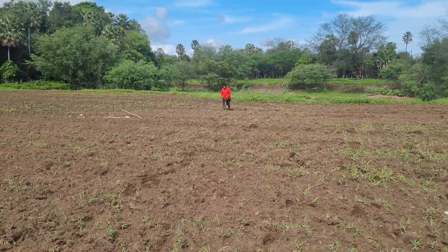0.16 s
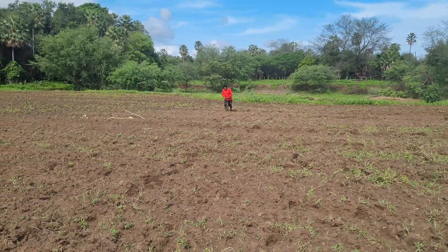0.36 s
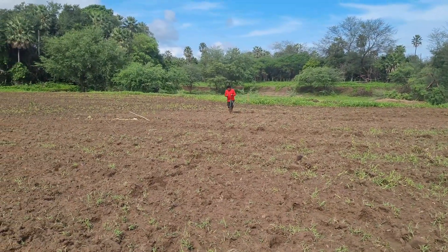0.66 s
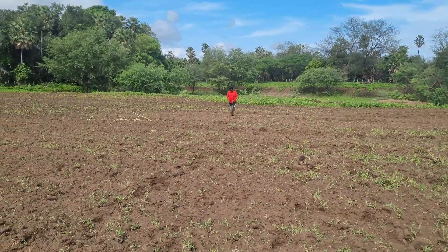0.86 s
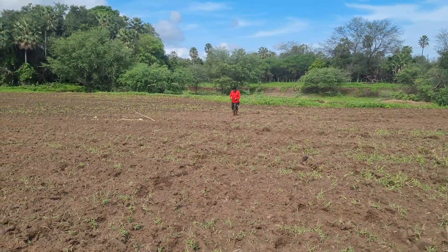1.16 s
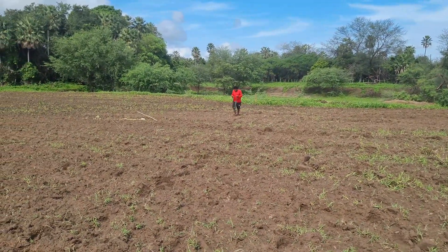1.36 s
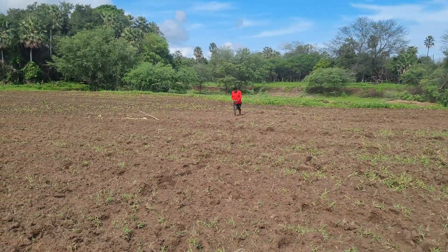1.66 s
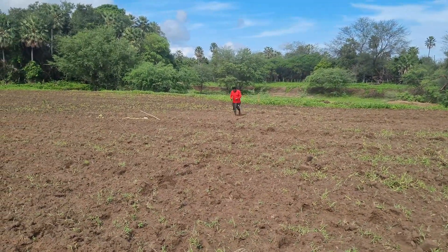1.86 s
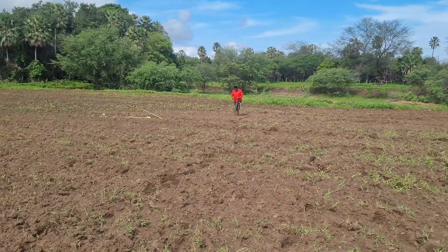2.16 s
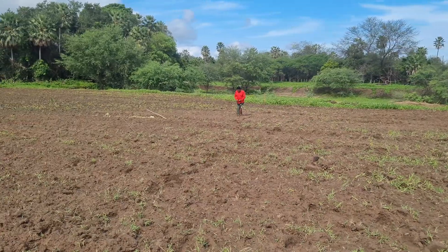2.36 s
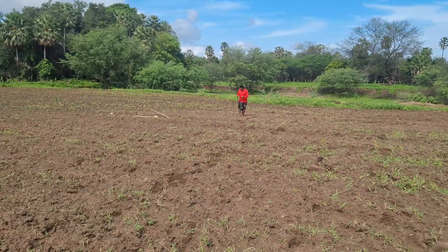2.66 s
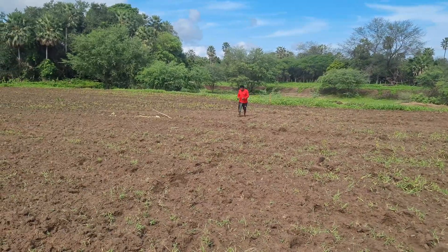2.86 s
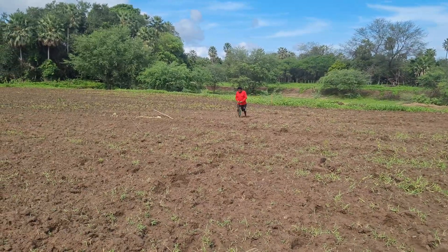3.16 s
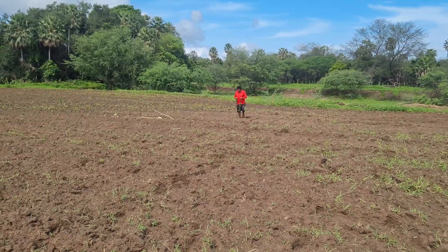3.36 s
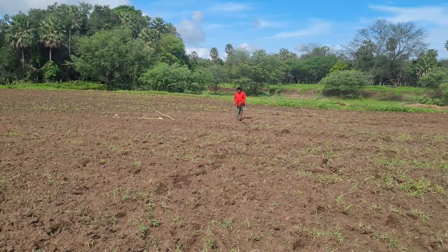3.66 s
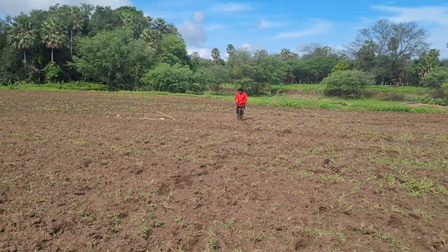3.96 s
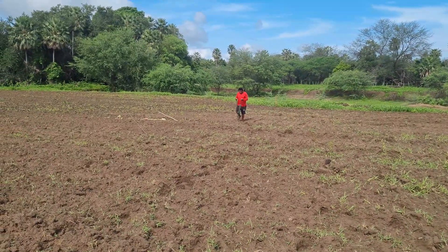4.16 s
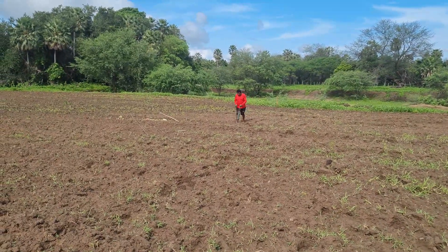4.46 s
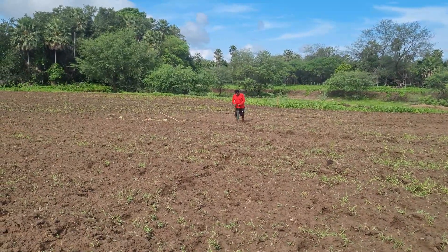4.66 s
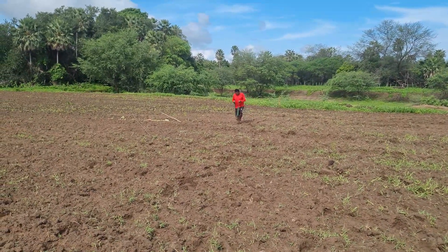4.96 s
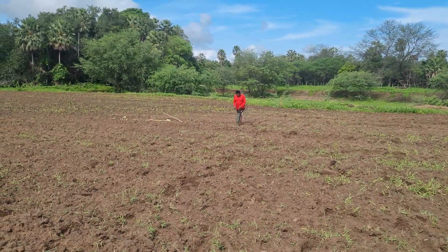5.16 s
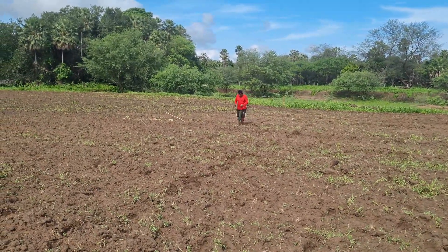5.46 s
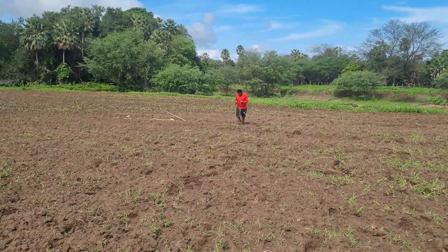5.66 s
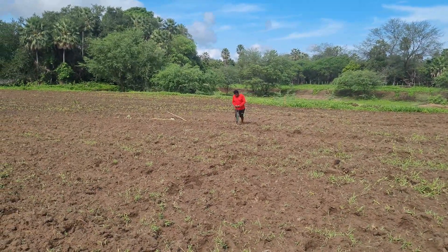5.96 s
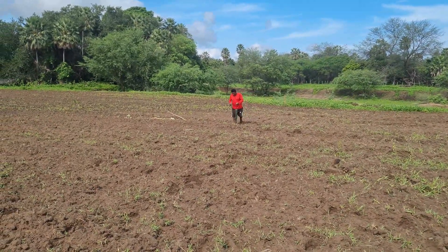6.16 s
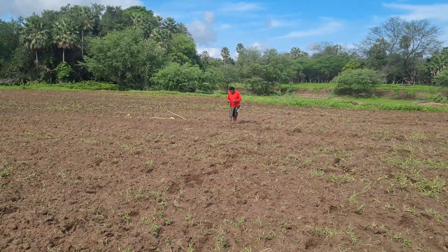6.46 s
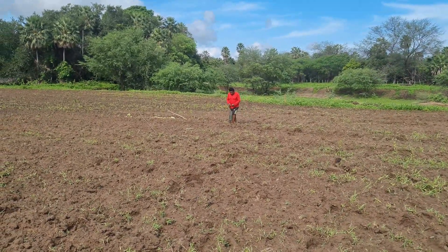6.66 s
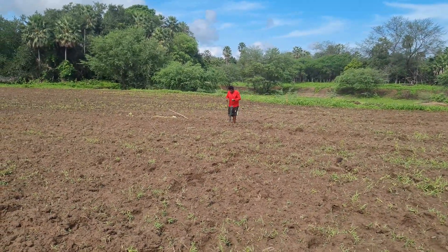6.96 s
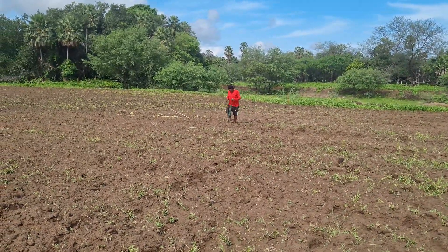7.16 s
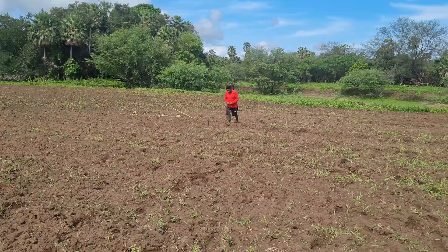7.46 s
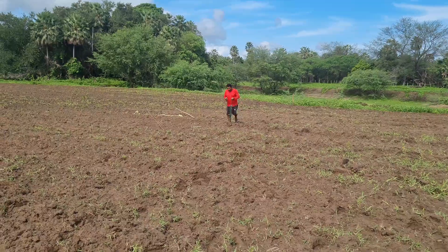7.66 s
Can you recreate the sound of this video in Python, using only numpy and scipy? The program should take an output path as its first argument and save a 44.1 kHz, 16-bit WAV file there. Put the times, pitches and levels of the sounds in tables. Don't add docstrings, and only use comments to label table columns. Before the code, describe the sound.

A close, dry, bright stereo sound of a hand-held seed planter in an open field, as picked up by a phone. At about 0.1 seconds seeds rush down the hollow metal tube, the thin jaw crunches into soil near 0.25, and the latch clacks sharply at 0.35. The cycle repeats about every 0.7 seconds, with clacks near 1.05, 1.75, 2.46, 3.18, 3.9, 4.6, 5.3, 6.05, 6.76 and 7.47. Most are followed about 0.2 seconds later by a lighter springing-open snap, though not around 0.55 or 6.25. Between them loose seeds tick and trickle, the hinge gives tiny squeaks and the spring rings very high. Quiet bird whistles and wobbling low trills are scattered throughout, with an arching cry at 0.3 to 0.75 and a higher whistle near 6.3. Soft air and a faint wavering engine drone continue until the end at about 7.8 seconds.

```python
import sys
import numpy as np
from scipy import signal
from scipy.fft import irfft
from scipy.io import wavfile
from scipy.ndimage import uniform_filter1d

SR = 44100
rng = np.random.default_rng(int(sys.argv[2]) if len(sys.argv) > 2 else 0)


def unload_wav(signal):
    wavfile.write(
        sys.argv[1],
        SR,
        np.round(np.clip(np.atleast_2d(signal).T, -1, 1) * 32767).astype(np.int16),
    )


def magnitude_from_level(level_db):
    exponent = np.asarray(level_db, float) / 20
    return 10 ** exponent


N = 344862

PLACES = 5
TOP_S = 0.1
CONTACT_MS, LATCH_FALL_MS = 0.4, 3.2

# (frequency [Hz], width [Hz], level [dB])
TUBE_MODES = [(277, 230, -11.5), (562.5, 83, -4.5), (729, 111, 0), (1100, 115, 4), (1610, 33, 10)]
# (frequency [Hz], gain [dB])
RIGHT_PORT = [(300, 3), (1000, 7), (1900, -7), (2700, 3), (4200, -2), (5500, 2), (7300, -7.5),
              (9300, -21.5), (10200, -8), (11000, 3.5), (11800, 5.5), (13000, 1), (15600, -12.5),
              (16300, -61)]
# (time [s], level [dB], ring [Hz], treble [dB], tube level [dB])
LATCH_CLACKS = [(0.3505, -13.5, 6340, 0.5, -47), (1.0527, -16.5, 4150, -2.5, -47),
                (1.7537, -14, 4300, 3, -38), (2.4638, -16, 6900, 7, -40.5), (3.176, -13.5, 2300, 4.5, -37),
                (3.8973, -15, 7000, 2, -36), (4.615, -15, 5060, 1, -35.5), (5.326, -11.5, 6800, 2, -39.5),
                (6.0455, -14, 7030, 1, -39.5), (6.7622, -13.5, 5600, 0.5, -38),
                (7.4672, -15.5, 7060, -.6, -46.5)]
# (time [s], level [dB], ring [Hz], treble [dB], tube level [dB])
LATCH_RELEASES = [(1.256, -17, 4930, 0.5, -43), (1.958, -18.5, 6600, 2, -51), (2.6681, -21, 5080, 2, -58),
                  (3.369, -15.5, 5040, 0.5, -51), (4.0976, -15.5, 5090, -2, -45),
                  (4.814, -17, 2690, -0.5, -43.5), (5.5363, -21.5, 2870, 0.5, -52),
                  (6.958, -21, 2960, 5.5, -48.5), (7.6409, -16, 5140, 3.5, -42)]


def evened(x):
    return x / np.sqrt(np.mean(x ** 2) + 1e-20)


def read(points, hz):
    f, value = np.transpose(points)
    return np.interp(np.log(hz + 1), np.log(f + 1), value)


def add(mix, s, sound):
    part = mix[round(s * SR):][:len(sound)]
    part += sound[:len(part)]


def from_tops(x):
    return x[..., round(TOP_S * SR):][..., :N]


def phase(hz):
    return 2 * np.pi * np.cumsum(hz) / SR


def resonate(x, hz, width):
    r = np.exp(-np.pi * width / SR)
    if np.ndim(hz) == 0:
        return 2 * signal.lfilter([1 - r], [1, -r * np.exp(2j * np.pi * hz / SR)], x + 1e-18).real
    turn = np.exp(1j * phase(hz))
    return 2 * (turn * signal.lfilter([1 - r], [1, -r], x * turn.conj() + 1e-18)).real


def body(x, modes):
    return sum((-1) ** k * magnitude_from_level(db) * resonate(x, hz, width) for k, (hz, width, db) in enumerate(modes))


def high_pass(x, order, hz):
    return signal.sosfilt(signal.butter(order, hz, "high", fs=SR, output="sos"), x)


def seeds(shape, share, spread_db):
    size = magnitude_from_level(spread_db * np.minimum(rng.exponential(1, shape), 4)) * rng.choice([-1., 1.], shape)
    return evened(size * (rng.random(shape) < share))


def swell(db, rise_ms, fall_ms):
    ms = np.arange(round(.25 * SR)) / SR * 1000 - 1000 * TOP_S
    rise, fall = np.clip([rise_ms, fall_ms], .3, 40)
    hard = rise < 3
    if hard:
        rise = .4
    fade = np.where(ms < 0, (abs(ms) / rise) ** 1.4, (abs(ms) / fall) ** .85)
    tail = magnitude_from_level(-16.5 - 9 * ms / 22) * (ms > 0)
    crack = magnitude_from_level(-2.5 - 9 * abs(ms) / 0.28) * (ms > 0) * hard
    return magnitude_from_level(db) * (magnitude_from_level(-9 * fade) + tail + crack) * signal.windows.tukey(len(ms), .1)


def air():
    # (frequency [Hz], level [dB per Hz])
    air_colour = [(30, -3), (44, 6), (59, -3), (180, -11.5), (1130, -13.5), (1370, -21.5), (2690, -5),
                  (8590, 0.5), (11900, 8), (16000, -28)]
    frames, hz = N // 256 + 5, np.fft.rfftfreq(1024, 1 / SR)
    a, b, c, d, patches = rng.standard_normal((frames, 513, 5)).T
    patches = evened(uniform_filter1d(uniform_filter1d(patches, 8, 0), 20, 1))
    patches = 2.8 * patches * (hz[:, None] > 150)
    shared, left = .35, a + 1j * b
    z = np.array([left, shared * left + np.sqrt(1 - shared ** 2) * (c + 1j * d)])
    z *= magnitude_from_level(read(air_colour, hz)[:, None] + patches) / (1 + (hz[:, None] / 2500) ** 2)
    wash = magnitude_from_level(-54.5) * evened(signal.istft(z, nperseg=1024, noverlap=768)[1][:, :N])
    return high_pass(wash, 4, 36) * magnitude_from_level(np.array([[-1.5], [1.5]]))


def far_engine():
    # (time [s], pitch [Hz], level [dB])
    drone_course = [(0, 55.3, -64), (1.6, 60.8, -62), (2.6, 72.6, -67.5), (4, 50.9, -69), (7.82, 47.6, -65)]
    s, hz, db = np.transpose(drone_course)
    t = np.arange(N) / SR
    hz = np.interp(t, s, hz)
    drone = evened(resonate(resonate(rng.standard_normal(N), hz, 2.3), hz, 2.3))
    return magnitude_from_level(np.interp(t, s, db)) * drone * magnitude_from_level(np.array([[-3.], [3.]]))


def whistles():
    # (time [s], length [s], first pitch [Hz], last pitch [Hz], level at the right port [dB])
    whistle_calls = [(0, 0.13, 988, 780, -49.5), (0.1, 0.12, 2840, 2750, -38),
                     (0.326, 0.07, 2590, 3060, -43), (0.618, 0.11, 3650, 3440, -45.5),
                     (0.703, 0.045, 3420, 2510, -43), (1.254, 0.18, 938, 725, -49),
                     (1.316, 0.13, 2140, 2270, -58), (1.4, 0.022, 3270, 3220, -46),
                     (1.785, .17, 1045, 877, -46.5), (2.012, 0.086, 1030, 915, -59),
                     (2.1, 0.021, 3150, 3260, -43), (2.14, .06, 5570, 5550, -46),
                     (2.755, 0.045, 3570, 3080, -66), (2.835, .015, 4500, 4460, -44.5),
                     (3.285, 0.16, 933, 762, -50.5), (3.47, 0.047, 4030, 3240, -52),
                     (3.568, 0.015, 3490, 3330, -41), (3.817, 0.21, 1010, 854, -49.5),
                     (3.981, 0.049, 865, 720, -49.5), (4.27, 0.075, 3200, 3190, -54.5),
                     (4.842, 0.059, 3100, 3170, -51), (4.98, 0.055, 3250, 2820, -56),
                     (5.342, 0.13, 960, 766, -48), (5.641, 0.075, 3720, 3550, -40.5),
                     (5.745, 0.023, 3530, 3580, -40), (5.934, 0.11, 1040, 850, -48),
                     (6.142, 0.058, 708, 760, -55), (6.267, 0.2, 5450, 5220, -35),
                     (7.043, 0.042, 2570, 2160, -35), (7.046, 0.087, 1610, 1635, -47.5),
                     (7.06, 0.019, 4450, 4480, -35), (7.109, 0.03, 3260, 3180, -37),
                     (7.122, 0.017, 4430, 4600, -46), (7.155, .17, 939, 750, -47.5),
                     (7.169, 0.253, 2060, 1990, -51.5), (7.523, 0.093, 1920, 1830, -45.5),
                     (7.663, 0.17, 1027, 901, -45)]
    out = np.zeros(N)
    for s, length, hz0, hz2, db in whistle_calls:
        hz1 = hz0 + 0.337 * (hz2 - hz0)
        u = np.linspace(0, 2, round(length * SR))
        hz = np.polyval(np.polyfit([0, 1, 2], [hz0, hz1, hz2], 2), u)
        shape = signal.windows.tukey(len(u), .25) * magnitude_from_level(-2.5 * u)
        add(out, s, magnitude_from_level(db - read(RIGHT_PORT, hz1)) * np.sin(phase(hz)) * shape)
    return out


def trills():
    # (time [s], length [s], pitch [Hz], wobble [turns/s], level at the right port [dB])
    trill_calls = [(1.147, 0.17, 838, 20.4, -51), (1.833, 0.19, 872, 31.6, -49),
                   (2.577, .15, 819, 23, -50.5), (3.31, 0.13, 819, 27, -48),
                   (3.647, 0.096, 950, 24.5, -51.5), (4.022, 0.12, 820, 19.7, -48.5),
                   (5.447, 0.11, 832, 23, -45), (5.724, 0.072, 974, 13, -55),
                   (6.197, 0.055, 808, 37, -47.5), (6.892, 0.11, 795, 18, -50),
                   (7.506, 0.084, 876, 18.4, -46)]
    out = np.zeros(N)
    for s, length, hz, turns, db in trill_calls:
        wobble = 2 * np.pi * turns * np.arange(round(length * SR)) / SR
        pitch = hz * (1 - 0.093 * np.cos(wobble))
        pulse = (1 - 0.6 * np.cos(wobble + 1.6)) * signal.windows.tukey(len(wobble), .3)
        add(out, s, magnitude_from_level(db - 2.5 - read(RIGHT_PORT, hz)) * pulse * np.sin(phase(pitch)))
    return out


def arching_cry():
    # (time [s], pitch [Hz], level [dB])
    cry_course = [(.3, 830, -68), (.37, 960, -60), (.46, 1090, -58), (.54, 1170, -58), (.61, 1230, -57),
                  (.7, 1150, -57), (.73, 1090, -61), (.76, 890, -66)]
    cry_harmonics = [-14, 8.5, -3]
    s, hz, db = np.transpose(cry_course)
    t = np.arange(s[0], s[-1], 1 / SR)
    turn = phase(np.interp(t, s, hz))
    tones = sum(magnitude_from_level(d) * np.sin((k + 1) * turn) for k, d in enumerate(cry_harmonics))
    out = np.zeros(N)
    add(out, s[0], magnitude_from_level(np.interp(t, s, db)) * tones * signal.windows.tukey(len(t), .05))
    return out


def birds():
    out = whistles() + trills() + arching_cry()
    out *= magnitude_from_level(2.8 * evened(uniform_filter1d(rng.standard_normal(N), 260)))
    echo = rng.standard_normal(4000) * magnitude_from_level(-60 * np.arange(4000) / SR / 0.13)
    smear = signal.oaconvolve(out, echo / np.linalg.norm(echo))[:N]
    return magnitude_from_level(3.5) * (out + magnitude_from_level(-5) * smear)


def hinge_squeaks():
    # (time [s], length [s], first pitch [Hz], last pitch [Hz], level at the right port [dB])
    squeak_glides = [(1.205, .02, 5900, 5200, -41), (1.808, 0.015, 4240, 5220, -32),
                     (1.917, 0.027, 6600, 5310, -37), (2.069, .01, 6800, 6270, -52),
                     (2.52, 0.011, 5940, 7000, -40), (2.556, 0.011, 6800, 5900, -45),
                     (2.831, 0.0076, 7300, 5800, -49), (3.221, 0.013, 4410, 5100, -33),
                     (3.335, 0.025, 6700, 5340, -33), (3.501, 0.016, 6670, 4430, -50),
                     (4.01, 0.015, 6650, 5740, -48), (4.054, 0.022, 6400, 5430, -32),
                     (4.229, .012, 6700, 5500, -47), (4.631, 0.015, 6340, 6760, -35),
                     (4.774, 0.014, 6130, 5600, -33), (4.932, 0.017, 5660, 5900, -49),
                     (4.976, 0.007, 6900, 5400, -46), (5.259, 0.0076, 6700, 7200, -41),
                     (5.494, 0.011, 6300, 6000, -38), (5.712, .01, 6540, 5100, -43),
                     (5.98, 0.023, 6420, 7030, -45), (6.778, 0.01, 6200, 6450, -31),
                     (6.853, 0.011, 6860, 7200, -53), (6.91, 0.021, 6400, 5760, -35),
                     (7.156, .012, 6600, 5000, -51), (7.413, 0.016, 7800, 7780, -37.5),
                     (7.442, .008, 6200, 5000, -28.5)]
    out = np.zeros(N)
    for s, length, hz0, hz1, db in squeak_glides:
        hz = np.linspace(hz0, hz1, round(length * SR))
        turn = phase(hz)
        tone = np.sin(turn) + magnitude_from_level(-7.5) * np.sin(2 * turn)
        add(out, s, magnitude_from_level(db + 5.5 - read(RIGHT_PORT, hz0)) * np.hanning(len(hz)) ** .5 * tone)
    return out * (1 + 0.2 * evened(uniform_filter1d(rng.standard_normal(N), size=40)))


def spring():
    # (frequency [Hz], width [Hz], level [dB])
    spring_modes = [(10940, 22, 1), (12000, 30, -10), (14310, 28, 4), (8180, 30, 6)]
    # (time [s], level [dB], rise [ms], fall [ms])
    spring_twangs = [(.962, -7, 3.2, 9.6), (2.62, -36, 2.7, 5.0), (2.715, -17, 4, 3.8),
                     (3.417, -22, 2.5, 11)]
    pluck = np.zeros(N + SR)
    for s, db, *_ in LATCH_CLACKS + LATCH_RELEASES:
        add(pluck, s, swell(db - 39.0, CONTACT_MS, LATCH_FALL_MS))
    for s, *shape in spring_twangs:
        add(pluck, s, swell(*shape))
    return magnitude_from_level(7.5) * body(from_tops(pluck * rng.standard_normal(N + SR)), spring_modes)


def slide_level():
    # (time [s], length [s], first level [dB], middle level [dB], last level [dB])
    seed_slides = [(0.098, 0.077, -29.5, -49, -43), (0.808, 0.063, -31.5, -43, -35),
                   (1.495, 0.14, -36, -46, -32.5), (2.177, 0.14, -37, -48, -24),
                   (2.933, 0.087, -32.5, -45, -21.5), (3.603, 0.092, -35, -49, -31),
                   (4.373, 0.074, -29, -33.5, -51), (5.081, 0.089, -33.5, -41.5, -29.5),
                   (5.814, 0.048, -29, -31.5, -49), (6.522, 0.11, -31, -40.5, -23.5),
                   (7.239, 0.095, -29.5, -36.5, -31)]
    t, slide = np.arange(N) / SR, np.zeros(N)
    for s, length, first_db, middle_db, last_db in seed_slides:
        lead = max(0.0059 * (-27 - first_db), .002)
        start = s + lead / 2
        times = [s - lead / 2, start, start + length / 2, start + length]
        db = [first_db - 24, first_db, middle_db, last_db]
        slide += magnitude_from_level(np.interp(t, times, db, -200, -200))
    quick, slow = (signal.lfilter([a], [1, a - 1], slide) for a in (.006, .0012))
    return np.maximum(quick, magnitude_from_level(3.5) * slow)


def rolling_level():
    # (time after the clack [s], level [dB])
    roll_course = [
        (-.01, -0.1),
        (.07, 4),
        (.28, 2.6),
        (.4, -2),
    ]
    roll_levels = [-46.5, -48.5, -48.5, -51, -47, -48, -48, -45, -44.5, -45, -46]
    course = [(0.01, -53.5)]
    for clack, left_db in zip(LATCH_CLACKS, roll_levels):
        course += [(clack[0] + s, left_db + db) for s, db in roll_course]
    return magnitude_from_level(np.interp(np.arange(N) / SR, *np.transpose(course)))


def loose_seeds():
    slide, level = slide_level(), rolling_level()
    clumps = rng.standard_normal((2, PLACES, N // 256 + 2))
    clumps = evened(uniform_filter1d(clumps, size=2, axis=2))
    clumps = evened(clumps + .35 * clumps[:, :1])
    slide_db, trickle_db = np.repeat(clumps, 256, axis=2)[..., :N] * [[[2.5]], [[5.0]]]
    rolling = seeds((PLACES, N), .03, 3.1) * level * magnitude_from_level(trickle_db - 15.5)
    hops = signal.lfilter([1], [1, -.994], abs(seeds((PLACES, N), .00012, 3.0)))
    rolling = rolling + magnitude_from_level(-26.0) * level * evened(hops) * rng.standard_normal((PLACES, N))
    sliding = magnitude_from_level(slide_db - 5.5) * slide * seeds((PLACES, N), 0.021, 2.8)
    pitches = np.geomspace(2900, 6800, PLACES)
    ticks = [resonate(x, hz, 1520) for x, hz in zip(rolling + magnitude_from_level(-10.0) * sliding, pitches)]
    return sliding + magnitude_from_level(-5.5) * rolling + magnitude_from_level(9.5) * np.array(ticks)


def brightened(rows):
    return [(*row, 12 * np.exp(-abs(row[3]) / 3.4)) for row in rows]


def small_blows():
    # (time [s], level [dB], fall [ms], ring [Hz])
    seed_ticks = [(0.2808, -23.5, 5.9, 3480), (0.556, -30, 9.4, 7200), (0.601, -39, 11, 2360),
                  (1.019, -34.5, 6.8, 3150), (1.118, -39, 16, 4100), (1.1483, -37, 17, 7500),
                  (1.168, -38.5, 6.6, 3050), (1.3394, -46, 5, 2150), (1.584, -26.5, 2.6, 2670),
                  (1.615, -33, 4, 2620), (1.901, -46, 2.2, 3150), (2.524, -41, 15, 6300),
                  (2.6181, -30.5, 9.9, 6170), (2.722, -30, 1.6, 6950), (2.772, -42, 3.7, 3230),
                  (2.883, -44.5, 23, 3200), (3.013, -30, 4.3, 4530), (3.082, -39, 2.3, 3300),
                  (3.119, -32, 2.7, 7600), (3.1346, -26, 3, 3170), (3.147, -30, 4.7, 3020),
                  (3.307, -38.5, 6.1, 2670), (3.4208, -29.5, 5.9, 5050), (3.713, -30.5, 6.5, 2580),
                  (4.519, -31, 3.6, 2680), (4.64, -35, 18, 6900), (4.687, -43, 11, 2550),
                  (4.712, -31, 8.5, 6600), (5.055, -45, 11, 5000), (5.4016, -35, 5.4, 5300),
                  (5.432, -29.5, 5, 3580), (5.481, -35, 2.4, 3160), (5.5986, -36, 4.2, 4050),
                  (5.656, -29, 4.2, 3860), (5.6828, -30.5, 5, 3960), (5.984, -33, 2, 6760),
                  (6.0257, -44, 2.6, 3280), (6.14, -35.5, 13, 5500), (6.225, -28, 4.7, 2850),
                  (6.356, -46, 3.2, 5310), (6.4108, -31, 7.9, 3520), (7.002, -37, 25, 2130),
                  (7.044, -26, 11, 3330), (7.066, -37, 5.4, 2470), (7.098, -37, 2, 3520),
                  (7.1626, -34.5, 1.7, 6000), (7.4467, -27, 2, 5160), (7.499, -35.5, 11, 2820),
                  (7.5897, -33.5, 53, 5400), (7.768, -27.5, 8, 3670)]
    # (time of the top [s], level [dB], rise [ms], fall [ms], ring [Hz])
    soft_shuffles = [(.2938, -18, 2.1, 3.3, 4170), (.4156, -36, 6.3, .6, 6800), (.4525, -38, 8.2, 21, 2200),
                     (1.2207, -33.5, 15, 0.52, 5700), (1.8189, -36, 14, 5.9, 4650),
                     (1.9321, -36, 7.2, 0.46, 6000), (2.0054, -35, 8.2, 15, 2400),
                     (2.0758, -39.5, 7.2, 11, 6250), (3.2267, -33.5, 3.6, 13, 4600),
                     (3.3484, -33, 12, 0.5, 6140), (3.8358, -29, 6.6, 1.2, 6100),
                     (4.0249, -42, 16, 2.4, 5670), (4.0678, -44, 13, 0.56, 5760),
                     (4.7876, -34.5, 19, 21, 6300), (4.8664, -41, 46, 9.9, 3360),
                     (5.503, -29, 8.3, 7.5, 6400), (6.159, -37.5, 5.8, 6.2, 3900),
                     (6.2832, -33, 14, 3.8, 2630), (6.377, -23.5, 2.6, 3.3, 3530),
                     (6.8554, -37, 11, 0.68, 6940), (6.9183, -34, 7.3, 0.78, 6300),
                     (7.4216, -32.5, 7.2, 0.48, 7800), (7.5359, -34, 18, 12, 2000),
                     (7.6895, -33, 34, 4.6, 2100)]
    single = [(s - .001, db, .4, fall, hz) for s, db, fall, hz in seed_ticks]
    return brightened(soft_shuffles + single)


def knocks():
    # (time of the top [s], level [dB], rise [ms], fall [ms], ring [Hz])
    further_blows = [(.165, -25.5, 14, 6.4, 2890), (.895, -32, 19, 3.3, 2630), (2.219, -31.5, 7, 4.1, 2500),
                     (2.256, -51, 3.5, 10, 2630), (2.808, -49, 4.4, 6, 3300), (2.957, -41, 1, 15, 2860),
                     (3.061, -17, 7.1, 3, 2930), (4.044, -47, 1, 3.4, 2840), (4.261, -54, 4.8, 9.4, 3660),
                     (4.428, -29, 8.2, 1.5, 2870), (4.568, -40, 1, 4.6, 2270), (4.771, -39, 1, 2.3, 2650),
                     (4.957, -41.5, 1, 6, 2730), (5.103, -24.5, 3.8, 5.8, 2510), (5.441, -30, 1, 3.8, 7240),
                     (5.524, -41, 1, 2.8, 4090), (5.567, -42, 4, 4, 3240), (5.671, -33, 1, 6, 3600),
                     (5.917, -16.5, 11, 1.9, 3860), (5.955, -37, 1, 1.3, 2620), (6.402, -35, 1, 4.4, 5360),
                     (6.541, -22, 7.8, 3.1, 2400), (7.079, -28, 1, 5, 2120), (7.115, -44, 38, 12, 3600),
                     (7.268, -24, 19, 4.6, 5850), (7.729, -47, 1, 5, 3700), (7.784, -35, 7.2, 8.5, 3700)]
    return brightened(further_blows)


def blows():
    # (time of the top [s], level [dB], rise [ms], fall [ms], tube level [dB])
    soil_crunches = [(0.2285, -15, 3.2, 1.2, -55), (0.252, -14.5, 22.5, 9.7, -41.5),
                     (0.5428, -20.5, 7.9, 2.1, -41.5), (0.9563, -14, 13.7, 9.9, -46.5),
                     (1.6365, -15, 4.6, 7.6, -47.5), (1.6562, -14, 11.4, 1.8, -42),
                     (2.354, -10.5, 16.6, 3.6, -46), (3.0363, -15, 5.2, 8.6, -49),
                     (3.0542, -18, 24, 0.93, -47), (3.7635, -11, 9.9, 9.7, -46.5),
                     (4.494, -10.5, 15, 5.2, -38.5), (5.198, -15, 6.1, 2.8, -48.5),
                     (5.212, -13, 17, 2.6, -50.5), (5.889, -16, 3.3, 15, -44.5), (5.907, -12, 15, 5.4, -46),
                     (6.2438, -21, 15, 1.3, -45), (6.637, -16.5, 2.6, 5.5, -54),
                     (6.656, -14, 20.4, 3.9, -41.5), (7.3358, -17.5, 10, 6.7, -42.5),
                     (7.3568, -17, 34, 3.5, -50)]
    rings = rng.uniform(4190, 7800, len(soil_crunches))
    on_jaw = [(*row[:4], hz, 2) for row, hz in zip(soil_crunches, rings)]
    on_tube = [(row[0], row[-1], 9.6, 18.7, -1) for row in soil_crunches]
    for clacks, fall_ms, tube_fall_ms in (LATCH_CLACKS, LATCH_FALL_MS, 7.1), (LATCH_RELEASES, 2.57, 19.7):
        on_jaw += [(s, db, CONTACT_MS, fall_ms, hz, treble_db) for s, db, hz, treble_db, _ in clacks]
        on_tube += [(row[0], row[-1], CONTACT_MS, tube_fall_ms, -1.5) for row in clacks]
    return on_jaw + small_blows(), on_tube


def strikes(rattles):
    out = np.zeros((PLACES, N + SR))
    size = round(.25 * SR)
    low_pass = signal.butter(2, 8500, fs=SR, output="sos")
    taps, bends = seeds((len(rattles), size), .4, 2.8), rng.uniform(-1, 1, len(rattles))
    for k, (s, db, rise_ms, fall_ms, hz, treble_db) in enumerate(rattles):
        level = swell(db, rise_ms, fall_ms)
        heard = np.flatnonzero(level > magnitude_from_level(db - 60))
        part = slice(heard[0], heard[-1])
        level = level[part]
        blow = taps[k, part] * level
        blow = blow * np.linalg.norm(level) / np.linalg.norm(blow)
        dull = signal.sosfilt(low_pass, blow)
        pitch = hz * (1 + 0.64 * bends[k] * (np.arange(size)[part] / SR - TOP_S))
        ring = resonate(blow, pitch, 152) + magnitude_from_level(-20.5) * resonate(blow, 2 * pitch, 370)
        ring = magnitude_from_level(-.25 * (db + 20.0) + 8.0) * ring
        sound = magnitude_from_level(-treble_db / 2) * (dull + ring) + magnitude_from_level(treble_db / 2) * (blow - dull)
        add(out[k % PLACES], s + heard[0] / SR, sound)
    return from_tops(out)


def tube(thuds):
    out, size = np.zeros(N + SR), round(SR / 4)
    chance = rng.uniform(-1.33, 1, (len(thuds), len(TUBE_MODES), 2))
    for (s, *shape, tilt_db), luck in zip(thuds, chance):
        noise, level = rng.standard_normal(size), swell(*shape)
        for (hz, width, db), (a, b) in zip(TUBE_MODES, luck):
            db = db + 1.5 * b + tilt_db * np.log2(hz / 1000)
            ring = resonate(noise * level, hz * (1 + .025 * a), width)
            share = np.linalg.norm(level) * np.sqrt(np.pi * width / SR) / np.linalg.norm(ring)
            add(out, s, magnitude_from_level(db) * ring * share)
    return magnitude_from_level(15.0) * from_tops(high_pass(out, 2, 300))


def jaw(taps):
    # (frequency [Hz], width [Hz], level [dB])
    jaw_modes = [(2670, 91, 1.5)]
    out = high_pass(taps, 4, 2000)
    return magnitude_from_level(3.0) * np.array([x + magnitude_from_level(-1.5) * body(x, jaw_modes) for x in out])


def planter():
    rattles, thuds = blows()
    loose = loose_seeds()
    taps = strikes(rattles) + strikes(knocks()) + loose
    rumble = magnitude_from_level(-5.0) * body(loose[1], TUBE_MODES[1:3])
    hum = magnitude_from_level(39.5) * body(np.tanh(loose[0] * 300) / 300, [(1595, 45, -20)])
    return jaw(taps), tube(thuds) + rumble + hum


def reflections(count):
    lag = np.arange(900)
    bounce = rng.standard_normal((count, 2, 900)) * magnitude_from_level(-60 * lag / SR / 0.018) * (lag > 6)
    bounce = magnitude_from_level(-2.0) * bounce / np.linalg.norm(bounce, axis=2, keepdims=True)
    bounce[-2:] *= magnitude_from_level(-12)
    return bounce + (lag == 0)


def ports(lanes, bounce):
    # (frequency [Hz], gain [dB])
    left_port = [(300, 0.5), (1000, 0), (2700, -18.5), (3300, -9), (5000, -10), (8500, -8.5), (9300, -3),
                 (10000, -6.5), (10700, -25.5), (13500, -8.5), (15600, -49), (16300, -59)]
    # (frequency [Hz], phase [rad])
    left_lead = [(0, 0), (600, 0), (860, 1.2), (1150, .3), (2500, 0), (4900, 2.3), (7500, 6), (10400, 7.7),
                 (11800, 12), (13400, 14.3), (15200, 16.5)]
    hz = np.fft.rfftfreq(2048, 1 / SR)
    lead = read(left_lead, hz)
    gain = np.array([magnitude_from_level(read(left_port, hz)), magnitude_from_level(read(RIGHT_PORT, hz)) * np.exp(-1j * lead)])
    log_gain = np.log(abs(gain[1]))
    least_phase = -signal.hilbert(np.r_[log_gain, log_gain[-2:0:-1]]).imag[:len(hz)]
    causal = least_phase + lead - 2 * np.pi * hz * 7 / SR
    colour = np.roll(irfft(gain * np.exp(1j * causal)), 256, 1)[:, :512] * np.hanning(512)
    heard = signal.oaconvolve(lanes[:, None], bounce, axes=2).sum(0)
    return signal.oaconvolve(heard, colour, axes=1)[:, 256:N + 256]


def scene():
    jaw_lanes, hollow = planter()
    lanes = np.vstack([jaw_lanes, hollow + hinge_squeaks() + spring(), birds()])
    return ports(lanes, reflections(count=PLACES + 2)) + air() + far_engine()


def roll_off(x):
    return signal.sosfilt(signal.butter(12, 16990, fs=SR, output="sos"), x)


def record(dry):
    return roll_off(np.clip(dry, -1, 1))


dry = scene()
out = record(dry)
unload_wav(out)
```